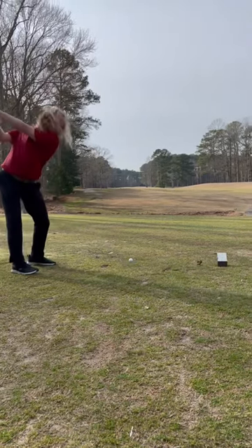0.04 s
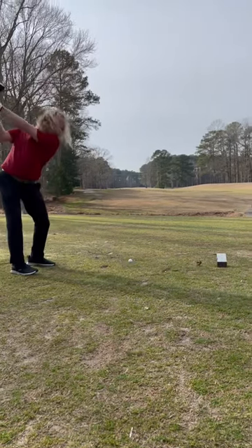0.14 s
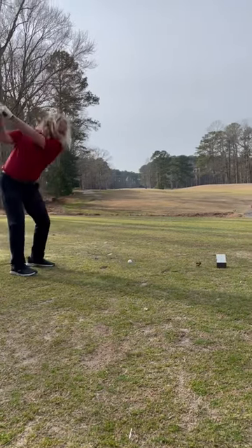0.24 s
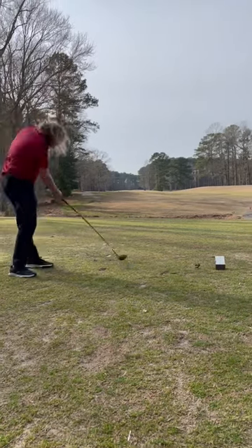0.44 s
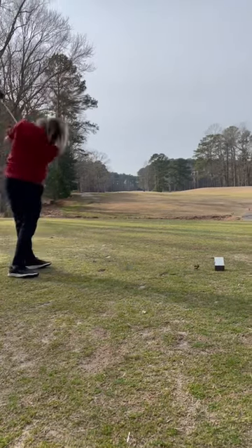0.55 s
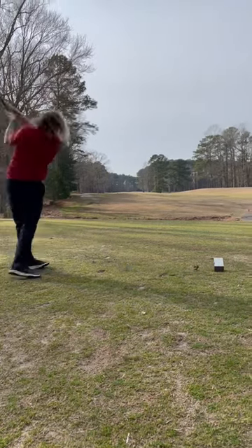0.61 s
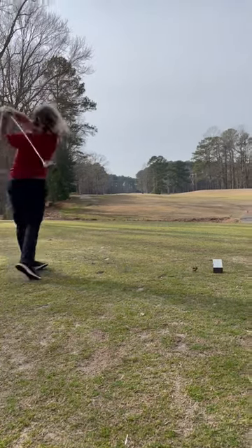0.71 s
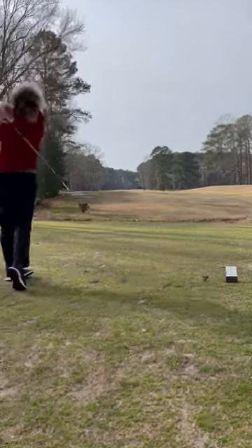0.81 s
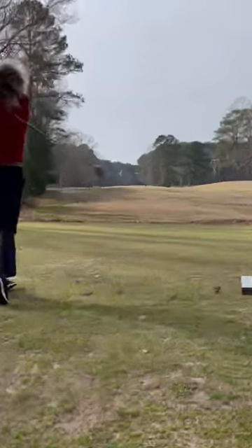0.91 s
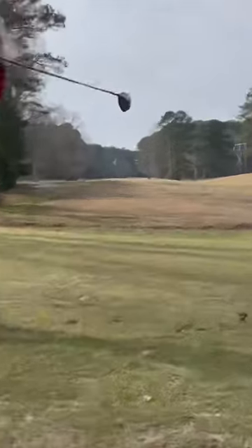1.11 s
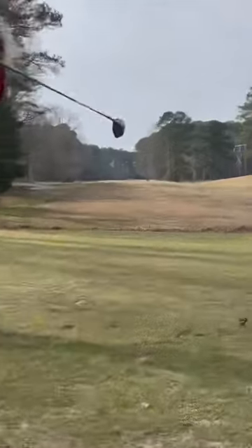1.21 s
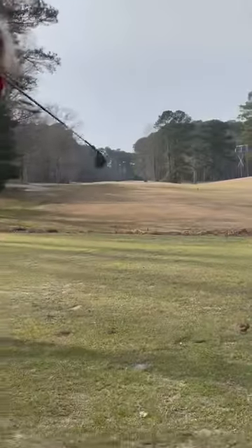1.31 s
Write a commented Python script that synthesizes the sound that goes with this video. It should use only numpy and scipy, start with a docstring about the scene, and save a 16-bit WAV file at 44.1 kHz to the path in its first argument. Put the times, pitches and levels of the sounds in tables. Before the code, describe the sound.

A golf driver strikes a ball with one sharp, loud metallic crack outdoors in gusty wind.

```python
"""On a golf tee with tree lines around it, a golfer to the left drives a ball.
The club's swish is a noise band that climbs in pitch and level into the blow.
Coloured noise bursts make the crack, snap and thud; decaying sines make the hollow metal head ring.
The crack returns from the trees as washes of noise, while gusts rumble and flutter on the microphone
over a steady breeze. Small ticks of turf and tee follow the blow, and faint clicks sit close by."""
import sys
import numpy as np
from scipy import signal
from scipy.fft import rfft, irfft
from scipy.io import wavfile
from scipy.ndimage import uniform_filter1d, map_coordinates

SR = 44100
rng = np.random.default_rng(int(sys.argv[2]) if len(sys.argv) > 2 else 0)


def int16_out(signal):
    """Quantize to a 16-bit WAV file."""
    q = np.round(np.clip(np.atleast_2d(signal).T, -1, 1) * 32767)
    wavfile.write(sys.argv[1], SR, q.astype(np.int16))


N = 59535
T = np.arange(N) / SR
HZ = np.maximum(np.arange(N // 2 + 1) * SR / N, 1)
# In every colour table the levels are relative: the noise is scaled to its own level afterwards.


def from_db(db):
    """Decibels to gain."""
    return 10 ** (np.asarray(db) / 20)


def rms_one(x):
    """Scale to unit power."""
    return x / np.sqrt(np.mean(x ** 2) + 1e-20)


def at_hz(points, hz):
    """Read a table along a log-frequency axis."""
    f, value = np.transpose(points)
    return np.interp(np.log(hz), np.log(f), value)


def noise(colour_db):
    """Unit-power noise: random phases under the given spectrum."""
    phase = 2 * np.pi * rng.random(len(HZ))
    return rms_one(irfft(from_db(colour_db) * np.exp(1j * phase), N))


def smooth(x, size):
    """Two passes of a moving average."""
    return np.abs(uniform_filter1d(uniform_filter1d(x, size), size))


def even(x, span_s):
    """Hold the power of a noise steady over the given span."""
    power = np.abs(signal.hilbert(x)) ** 2 / 2
    return x / np.sqrt(smooth(power, max(int(span_s * SR), 1)) + 1e-9)


def swell(start, db, rise, fall, hold=0):
    """Attack, hold and release, straight in dB; rise and fall are seconds per 60 dB."""
    before = np.maximum(start - T, 0) / rise
    after = np.maximum(T - start - hold, 0) / fall
    return from_db(db - 60 * (before + after))


# left-right likeness of distant sound: f/Hz, correlation/share
LIKENESS = [(100, 0.998), (400, 0.67), (1000, .8), (2400, 0.64), (5000, .05), (12000, 1)]


def wide_noise(colour_db):
    """Stereo noise from mid and side parts, weighted for the likeness at each frequency."""
    alike = np.clip(at_hz(LIKENESS, HZ), -.99, .99)
    mid = irfft(rfft(noise(colour_db)) * np.sqrt(1 + alike), N)
    side = irfft(rfft(noise(colour_db)) * np.sqrt(1 - alike), N)
    return np.array([mid + side, mid - side])


# colour of the breeze over the course: f/Hz, level/dB
BREEZE_COLOUR = [(20, -9), (70, 10), (150, 0), (400, 1.5), (750, -1.5), (1300, -6.5), (2000, -20),
                 (3200, -27), (4500, -23), (6500, -35), (8500, -46.5), (15000, -45)]
BREEZE_DB = -56.5


def breeze():
    """Steady moving air as a wide bed of coloured noise."""
    return from_db(BREEZE_DB) * wide_noise(at_hz(BREEZE_COLOUR, HZ))


# gusts on the microphone: start t/s, length/s, rumble level/dB, flutter level/dB
GUSTS = [(0.0, 0.0047, -35, -76), (0.047, 0.023, -45, -47), (0.115, 0.02, -36.5, -39.5),
         (0.148, 0.011, -41.5, -56), (0.205, 0.029, -45.5, -40), (0.228, 0.071, -29, -42),
         (0.304, 0.119, -35, -43), (0.614, 0.036, -42, -40), (0.659, 0.037, -32.5, -37),
         (0.746, 0.079, -45, -56), (0.839, 0.031, -41.5, -43.5), (0.953, 0.021, -30.5, -31),
         (0.988, 0.037, -43, -54.5), (1.041, .038, -33.5, -35), (1.081, 0.075, -39.5, -48),
         (1.156, 0.0414, -44.5, -47.5), (1.222, 0.047, -38.5, -47), (1.296, 0.0029, -42.5, -32.5),
         (1.317, 0.037, -34.5, -46)]
# colour of the longer, low rumble: f/Hz, level/dB
RUMBLE_COLOUR = [(20, -25.5), (35, -18.5), (60, 5.5), (120, 6.5), (180, -2.5), (260, -12), (500, -54),
                 (4000, -100)]
# colour of the rough flutter: f/Hz, level/dB
FLUTTER_COLOUR = [(100, -10.5), (200, 2.5), (300, 1), (450, -3), (600, -11.5), (850, -30.5), (1500, -38),
                  (4000, -52), (9000, -90.5)]
GUST_RISE_S, RUMBLE_FALL_S, FLUTTER_FALL_S = 0.012, 0.12, 0.021  # seconds per 60 dB
WIND_SIDE_DB = -25.5  # side part against the mid


def wind():
    """Each gust buffets the microphone: rough flutter over a longer rumble, almost alike on both sides."""
    rumble = np.max([swell(t, rumble_db, GUST_RISE_S, RUMBLE_FALL_S, length)
                     for t, length, rumble_db, _ in GUSTS], axis=0)
    flutter = np.max([swell(t, flutter_db, GUST_RISE_S, FLUTTER_FALL_S, length)
                      for t, length, _, flutter_db in GUSTS], axis=0)

    def buffeting():
        """One draw of turbulent pressure under the gust envelopes."""
        low = rumble * even(noise(at_hz(RUMBLE_COLOUR, HZ)), 0.0074)
        return low + flutter * even(noise(at_hz(FLUTTER_COLOUR, HZ)), 0.0083)

    mid, side = buffeting(), buffeting()
    return mid + from_db(WIND_SIDE_DB) * side * np.array([[1], [-1]])


# faint clicks: t/s, level/dB
CLICKS = [(0.144, -66), (1.244, -69)]
# colour of the clicks: f/Hz, level/dB
CLICK_COLOUR = [(800, -16), (3000, 9), (6000, -6), (11000, -3), (15000, -13)]


def clicks():
    """Faint, thin clicks close to the microphone, as short noise bursts."""
    return noise(at_hz(CLICK_COLOUR, HZ)) * sum(swell(t, db, .015, .023) for t, db in CLICKS)


# echoes from ground and trees: arrival t/s, level/dB, rise/s and fall/s per 60 dB, treble tilt/dB per octave
ECHOES = [(0.42, -56.5, 0.023, 0.98, 6.5), (0.598, -50.5, 0.27, 0.84, 2), (0.679, -49, 0.11, 0.99, -1.5),
          (0.918, -56, 0.88, 2.07, -3.5)]
# colour of the echoes before their tilt: f/Hz, level/dB
ECHO_COLOUR = [(200, -15), (450, -5.5), (750, -1.5), (1700, -1), (2400, -4), (3400, -15.5), (4300, -12.5),
               (5200, -16.5), (6600, -21), (7600, -46.5), (9000, -29), (12000, -38), (15000, -56.5)]
# head modes that stand out in the echo: f/Hz, distance to quarter power/Hz, arrival t/s, level/dB,
# rise/s and fall/s per 60 dB
ECHO_RINGS = [(4444, 76, .59, -56, .12, 0.99), (4240, 380, 0.64, -59, 1, 1.14)]


def echoes():
    """Trunks and branches scatter the crack into soft washes that carry the head's ring."""
    out = np.zeros((2, N))
    for t, db, rise, fall, tilt in ECHOES:
        colour_db = at_hz(ECHO_COLOUR, HZ) + tilt * np.log2(HZ)
        out += wide_noise(colour_db) * swell(t, db, rise, fall)
    for hz, width, t, db, rise, fall in ECHO_RINGS:
        peak_db = -20 * np.log10(1 + ((HZ - hz) / width) ** 2)
        out += wide_noise(peak_db) * swell(t, db, rise, fall)
    return out


# small ticks after the blow: t/s, level/dB
TICKS = [(0.424, -37.5), (0.439, -51), (0.4681, -45)]
# colour of the ticks: f/Hz, level/dB
TICK_COLOUR = [(200, -15), (1200, 3.5), (2500, 3), (3500, -7.5), (7000, -21.5), (14000, -31)]
TICK_RISE_S, TICK_FALL_S = .012, .06  # seconds per 60 dB


def ticks():
    """Brief scuffs of turf and tee, as bursts of evened noise."""
    envelope = sum(swell(t, db, TICK_RISE_S, TICK_FALL_S) for t, db in TICKS)
    return even(noise(at_hz(TICK_COLOUR, HZ)), .003) * envelope


# the downswing: t/s, pitch of the rushing air f/Hz, level/dB
SWING = [(0.19, 552.4, -85), (0.225, 563.5, -63.5), (0.299, 580.5, -63.5), (0.346, 629.2, -45.5),
         (0.369, 686, -39.5), (0.394, 768, -37), (0.402, 1342, -30), (0.408, 1826, -18.5),
         (0.411, 1090, -21.5), (0.421, 695, -50.5), (0.46, 600.7, -74.5)]
# colour of the air torn by the club head: f/Hz, level/dB
HISS_COLOUR = [(300, -6.5), (700, -3), (1350, -4), (2400, -11.5), (3500, -16.5), (6500, -8), (12000, -29.5),
               (16000, -41.5)]
SWISH_WIDTH = .21  # share of the pitch
HISS_DB, HISS_FOLLOWS = -8, 0.87  # hiss level at a 0 dB swish; hiss dB per swish dB


def swish():
    """Eddies shed by shaft and head rise in pitch and level as the club speeds up, then die away."""
    t, hz, db = np.transpose(SWING)
    hz = np.interp(T, t, hz)
    db = np.interp(T, t, db, left=-120, right=-120)
    cycles = np.cumsum(hz) / SR
    # random amplitudes spaced in cycles, so the band widens with the pitch
    place = cycles * SWISH_WIDTH * 2
    knots = rng.standard_normal((2, int(place[-1]) + 2))
    a, b = (map_coordinates(k, [place], order=3) for k in knots)
    band = a * np.cos(2 * np.pi * cycles) + b * np.sin(2 * np.pi * cycles)
    hiss = from_db(HISS_FOLLOWS * db + HISS_DB) * noise(at_hz(HISS_COLOUR, HZ))
    return from_db(db) * even(band, 0.0013) + hiss


SNAP_S = 0.4118  # the snap, which also starts the ring
# modes of the club head: f/Hz, level/dB, decay over 60 dB/s, build-up time constant/s
HEAD = [(3770, -25.5, 0.055, 0.028), (3900, -32, .22, .01), (4060, -48, .15, .01), (4479, -36, 0.096, .01),
        (6400, -31.5, .065, .03), (6121, -29, 0.077, 0.013), (6800, -28, 0.039, .0005),
        (8220, -17.5, .026, 0.00039), (8770, -21.5, 0.038, .0005), (9900, -43, .07, .0005),
        (10290, -25.5, .024, 0.00069), (11800, -25.5, 0.019, .0005)]
RING_WAVER_HZ, RING_WAVER_DB = 70, 3  # quarter-power rate and rms depth of the level waver


def head_ring():
    """The hollow head rings in modes, each building up and decaying at its own rate and wavering in level."""
    age = np.maximum(T - SNAP_S, 0)
    slow = -20 * np.log10(1 + (HZ / RING_WAVER_HZ) ** 2)
    ring = np.zeros(N)
    for hz, db, t60, build in HEAD:
        level = from_db(db + RING_WAVER_DB * noise(slow))
        envelope = (1 - np.exp(-age / build)) * np.exp(-np.log(1000) * age / t60)
        ring += level * envelope * np.sin(2 * np.pi * hz * age)
    return ring


def resonances(modes):
    """Level in dB at each frequency of a set of damped resonances."""
    power = sum(from_db(db) ** 2 / (1 + ((HZ - hz) / (2 * width)) ** 2) ** 2 for hz, width, db in modes)
    return 10 * np.log10(power)


def burst(colour_db, envelope):
    """A short burst of pressure, recoloured after shaping so its broad spectrum keeps to the colour."""
    x = even(noise(colour_db), 0.0013) * envelope
    spectrum = rfft(x)
    broad_power = smooth(np.abs(spectrum) ** 2, 300)
    recoloured = irfft(spectrum / np.sqrt(broad_power + 1e-12) * from_db(colour_db), N)
    return x.std() * rms_one(recoloured)


# damped resonances of ball and club: f/Hz, half the distance to quarter power/Hz, level/dB
CRACK_MODES = [(783, 70, 0.5), (1065, 48, -5), (1385, 90, -1.5), (1590, 38, 2), (1880, 37, 5),
               (2210, 140, 2.5), (2618, 71, -2.5), (2980, 68, -9), (3550, 150, -20.5), (6700, 350, -18)]
# colour of the snap and its fizz: f/Hz, level/dB
SNAP_COLOUR = [(1000, -17.5), (2500, -17), (3800, -1), (5000, -15.5), (6700, 8), (7500, 0.5), (8300, 9),
               (9500, -13.5), (10900, -11.5), (13000, -18), (16000, -25)]
# colour of the thud: f/Hz, level/dB
THUD_COLOUR = [(30, -4.5), (130, -3.5), (380, 1.5), (520, -3.5), (800, -3), (1400, -16.5), (3000, -34),
               (8000, -69.5)]
# every rise and fall is seconds per 60 dB
CRACK_S, CRACK_HOLD_S, CRACK_DB, CRACK_RISE_S, CRACK_FALL_S = 0.4092, 0.0026, -9, .022, 0.01
SNAP_DB, SNAP_RISE_S, SNAP_FALL_S = -10.5, .008, .018
FIZZ_DB, FIZZ_RISE_S, FIZZ_FALL_S = -22, .04, 0.097
THUD_S, THUD_DB, THUD_RISE_S, THUD_FALL_S = 0.4135, -16.5, 0.016, .032


def blow():
    """Crack of the ball, bright snap of the face with a fizzing tail, and a low thud of air."""
    crack_swell = swell(CRACK_S, CRACK_DB, CRACK_RISE_S, CRACK_FALL_S, CRACK_HOLD_S)
    snap_swell = swell(SNAP_S, SNAP_DB, SNAP_RISE_S, SNAP_FALL_S)
    fizz_swell = swell(SNAP_S, FIZZ_DB, FIZZ_RISE_S, FIZZ_FALL_S)
    thud_swell = swell(THUD_S, THUD_DB, THUD_RISE_S, THUD_FALL_S)
    crack = burst(resonances(CRACK_MODES), crack_swell)
    snap = burst(at_hz(SNAP_COLOUR, HZ), snap_swell + fizz_swell)
    thud = burst(at_hz(THUD_COLOUR, HZ), thud_swell)
    return crack + snap + thud


# how far the left side leads: f/Hz, phase/radians
LEFT_LEAD = [(800, 0), (2500, .6), (4000, 1.7), (7500, 3.1), (9500, 4.2), (11000, 6.3), (12500, 7.3),
             (14000, 9.4)]
# how much louder the left side is: f/Hz, level/dB
LEFT_LOUDER = [(300, .2), (550, 2.5), (850, 5.5), (1300, 2.5), (2500, 1.3), (5000, -.3), (9000, .7)]


def from_the_left(x):
    """The golfer's sound leads in phase on the left and is louder there over most of the range."""
    half_db = at_hz(LEFT_LOUDER, HZ) / 2
    half_lead = at_hz(LEFT_LEAD, HZ) / 2
    left = from_db(half_db) * np.exp(1j * half_lead)
    return irfft(rfft(x) * np.array([left, 1 / left]), N)


def scene():
    """The breeze, the gusts, the clicks, the echoes and the stroke."""
    stroke = from_the_left(ticks() + swish() + head_ring() + blow())
    return breeze() + wind() + clicks() + echoes() + stroke


THRESHOLD_DB, DUCK_SHARE = -7, .55  # share of the excess dB that is taken off
RELEASE_DB_PER_S, DUCK_ATTACK_S = 26, 0.0072  # attack as a time constant


def gain_control(x):
    """The gain drops just after a loud peak and creeps back, alike on both sides."""
    peak_db = 20 * np.log10(np.abs(x).max(axis=0) + 1e-9)
    duck_db = np.maximum(peak_db - THRESHOLD_DB, 0) * DUCK_SHARE
    release = RELEASE_DB_PER_S * T
    held_db = np.maximum.accumulate(duck_db + release) - release
    pole = np.exp(-1 / (DUCK_ATTACK_S * SR))
    return x * from_db(-signal.lfilter([1 - pole], [1, -pole], held_db))


CEILING = 1.2  # amplitude that the rounded peaks approach
STOP_HZ = 16400  # from here up the treble is 70 dB down


def record(dry):
    """The gain ducks on loud peaks, the peaks are rounded and the top is cut."""
    rounded = CEILING * np.tanh(gain_control(dry) / CEILING)
    top_cut = signal.cheby2(16, 70, STOP_HZ, fs=SR, output="sos")
    return signal.sosfilt(top_cut, rounded)


dry = scene()
out = record(dry)
int16_out(out)
```